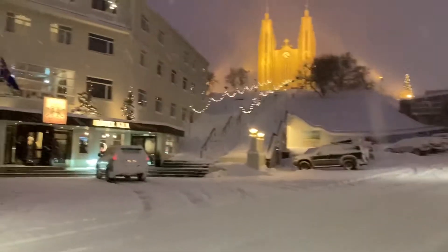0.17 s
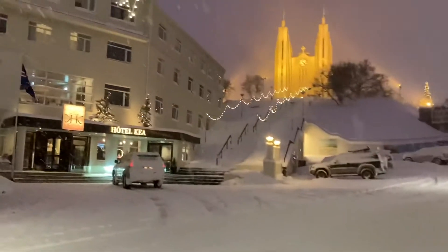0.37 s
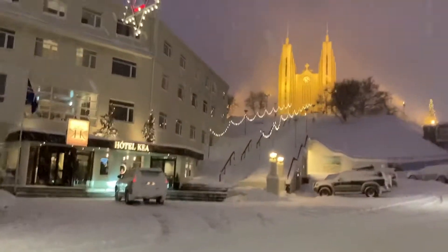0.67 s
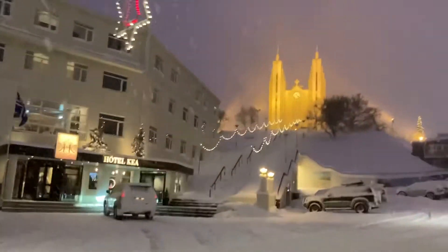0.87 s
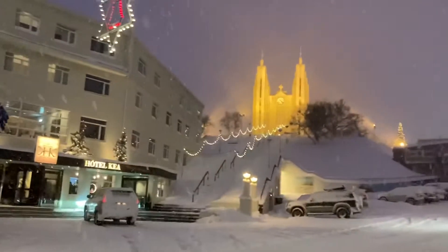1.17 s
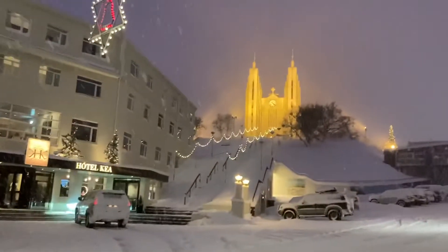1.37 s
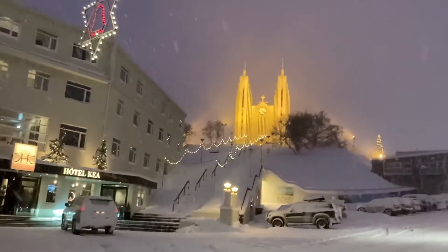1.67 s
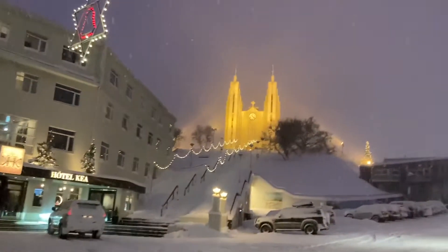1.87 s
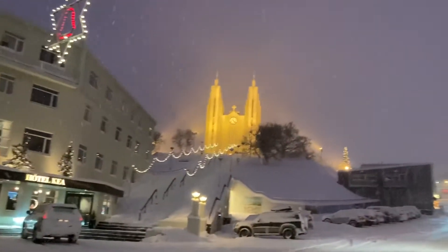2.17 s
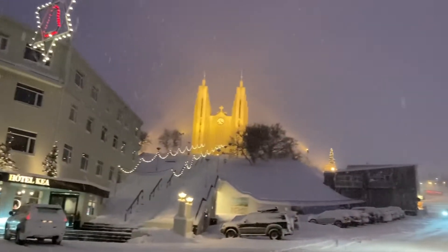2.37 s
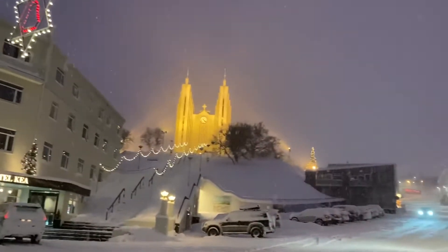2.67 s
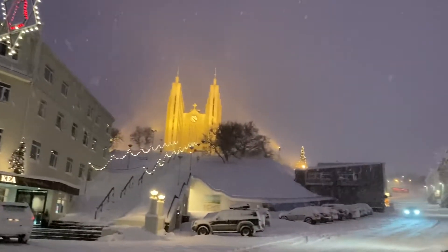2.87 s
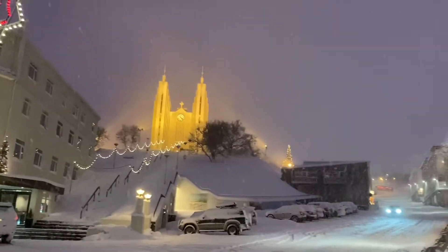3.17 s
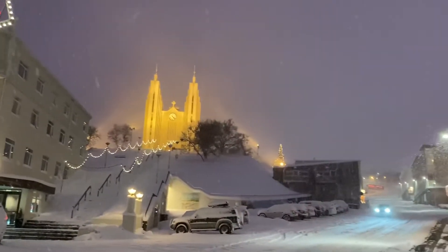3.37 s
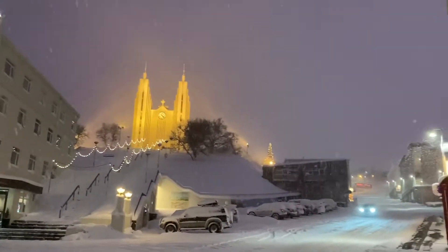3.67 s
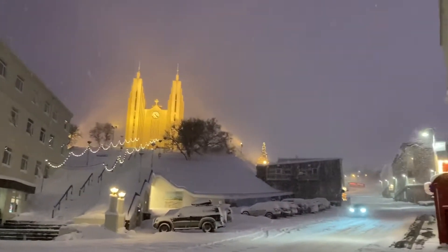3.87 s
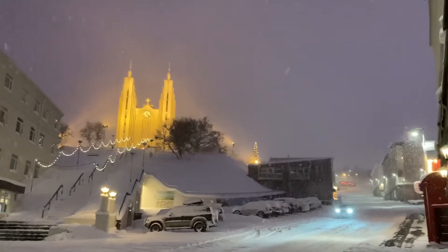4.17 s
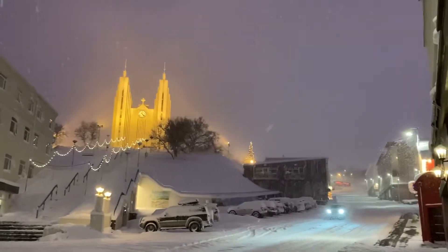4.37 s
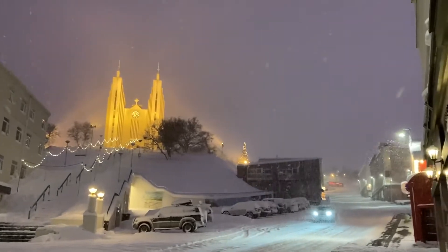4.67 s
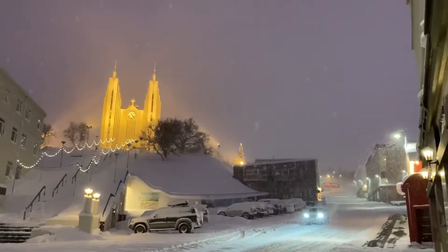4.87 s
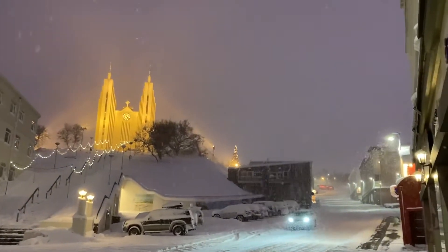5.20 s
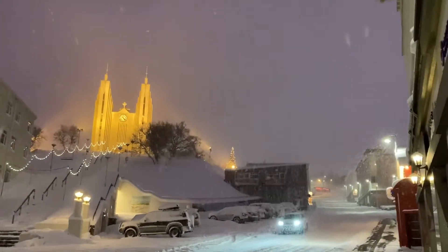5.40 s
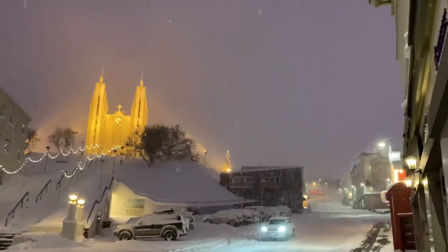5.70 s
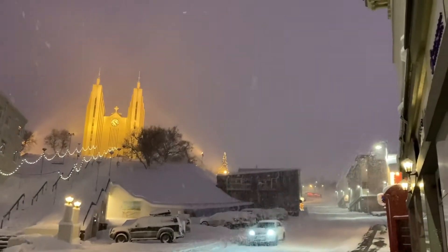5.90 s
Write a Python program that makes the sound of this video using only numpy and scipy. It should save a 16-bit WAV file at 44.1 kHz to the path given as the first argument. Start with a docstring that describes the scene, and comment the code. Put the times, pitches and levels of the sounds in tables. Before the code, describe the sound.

A low exhaust boom climbs in pitch and dies away to the left with hissing tyres, over wind rumble, muffled distant traffic and a faint fan hum. Small squeaks and jacket swishes sit near the phone's two microphones. Then another car approaches from ahead, engine and tread roar swelling with gritty snow crunch; late on its tyres thump through ruts and crush a few snow clods. No voices.

```python
"""A snow-covered town street at night, through a phone's two microphone ports. From the start a small car
gathers speed, its exhaust a rising tone and its tyres hissing noise grains, then fades. Filtered noise gives
the town and low wind, sines a fan, resonant noise its duct; a jacket soon rustles close by. Faint squeaks
follow as ringing noise bursts. A second car nears, its tyres drumming and crunching on packed snow; late on,
its tyres throb in ruts, the car booms low, and its tyres crush clods."""
import sys
import numpy as np
from scipy import signal
from scipy.fft import rfft, irfft
from scipy.io import wavfile

SR = 44100
rng = np.random.default_rng(int(sys.argv[2]) if len(sys.argv) > 2 else 0)


def output_pcm(signal):
    """Save a mono or channel-first signal as 16-bit PCM at the path in sys.argv[1].

    Samples are clipped to [-1, 1] before scaling.
    """
    pcm = np.clip(np.atleast_2d(signal).T, -1, 1) * 32767
    wavfile.write(sys.argv[1], SR, np.round(pcm).astype(np.int16))


N = 266364
TIME_S = np.arange(N) / SR
FREQS_HZ = np.maximum(np.fft.rfftfreq(N, 1 / SR), 1)

# Exhaust boom of the leaving car. Each row: time in seconds, level in dB.
BOOM_DB = [(0, -32.5), (.2, -44.5), (.5, -37.5), (1.25, -38.5), (1.8, -33.5), (2.2, -31), (2.55, -35),
           (3.3, -34.5), (3.8, -41.5), (4.1, -37.5), (4.5, -54)]
# Tyre hiss of the leaving car. Each row: frequency in Hz, relative density in dB per Hz.
LEAVING_HISS_DB = [(250, -8.5), (500, -2.5), (900, 4), (1400, 0.5), (2200, -5.5), (3200, -10), (4200, -18),
                   (6000, -32.5), (12000, -46.5)]
# Town hum. Each row: frequency in Hz, relative density in dB per Hz.
TOWN_SPECTRUM_DB = [(60, 10), (110, 9.5), (180, 4), (260, -1), (350, -0.5), (460, -6.5), (600, -4.5),
                    (760, -5), (890, -2.5), (1050, -8.5), (1500, -14), (3000, -26.5), (5800, -35),
                    (7200, -43), (15000, -50.5)]
# Tones of a ventilation fan on a house front. Each row: frequency in Hz, level in dB.
FAN_TONES = [(70, -60), (120.6, -56), (241.2, -66.5), (361.8, -68.5)]
# Resonances of the fan's duct. Each row: frequency in Hz, width in Hz, level in dB.
DUCT_RESONANCES = [(716, 36, -64), (837, 34, -66), (892, 40, -62.5), (943, 35, -65.5)]
# Gusts over a steady breeze. Each row: centre in seconds, length in seconds, peak level in dB.
GUSTS = [(0, 0.83, -43.5), (2.1, 1.5, -44), (3.25, 0.47, -43)]
# Wind on the ports. Each row: frequency in Hz, relative density in dB per Hz.
WIND_SPECTRUM_DB = [(18, -27), (30, -21), (40, -4.5), (48, -3), (60, 0), (85, -11), (160, -17), (400, -50)]
# Swishes of the jacket sleeve. Each row: centre in seconds, length in seconds, peak level in dB.
SWISHES = [(.1, 0.76, -71.5), (.49, 0.3, -72.5), (.72, 0.33, -75.5), (1.78, .14, -79), (3.82, 0.15, -74),
           (4.04, 0.12, -70.5), (4.47, 0.74, -71), (4.585, 0.17, -69), (4.69, 0.17, -72.5), (5.95, 1, -72)]
# Jacket cloth. Each row: frequency in Hz, relative density in dB per Hz.
CLOTH_DB = [(1500, -11.5), (3600, 9), (5600, 1.5), (7000, -4), (8300, 2.5), (10000, -7), (12000, -22.5),
            (15000, -21)]
# Faint squeaks and scrapes. Each row: centre in seconds, length in seconds, frequency in Hz, width in Hz,
# level in dB, glide in Hz per second, phase lead of the left port in rad.
SQUEAKS = [(1.302, .5, 3180, 600, -69.5, 0, 4.5), (2.0, .2, 2600, 700, -68, -1, 4.5),
           (2.44, .015, 4850, 395, -73, 1, 1), (2.565, 0.011, 4020, 400, -64.5, -1, .8),
           (2.62, .1, 4200, 600, -75.5, -4, .8), (2.779, .2, 2790, 1100, -69.5, 0, .8),
           (2.791, 0.49, 4410, 321, -74.5, 800, .8), (2.973, 0.13, 1130, 110, -54.5, 898, 0.33),
           (3.01, .11, 4610, 200, -76, -1500, .8), (3.7, .2, 1750, 450, -61, 0, .3),
           (4.585, 0.07, 3580, 520, -66, 0, 1), (4.655, 0.006, 4700, 900, -67, 0, 1.9),
           (5.69, .19, 3620, 130, -68.5, -600, 1.4), (5.8, .4, 4500, 2000, -77, 0, 1.4),
           (5.83, 0.26, 3644, 220, -68, 297, 1.4), (5.901, .6, 2550, 700, -72, 0, 3),
           (5.978, 0.23, 3660, 220, -75, 0, 1.7)]
# Drumming, roar and crunch of the nearing car. Each row: frequency in Hz, relative density in dB per Hz.
DRUM_SPECTRUM_DB = [(30, -33), (48, -15), (62, 3.5), (92, -1), (145, 1.5), (180, -5.5), (225, -6.5),
                    (252, -14), (400, -34.5), (900, -53)]
ROAR_SPECTRUM_DB = [(120, -9.5), (280, -6.5), (480, -1.5), (720, -0.5), (950, -9.5), (1400, -11),
                    (2200, -21), (5000, -50.5)]
CRUNCH_SPECTRUM_DB = [(300, -22.5), (600, -5.5), (900, 4), (1150, 0), (1380, -3), (1700, -0.5),
                      (1950, -6.5), (2200, -11.5), (3500, -21.5), (5000, -38.5), (9000, -40.5),
                      (15000, -58.5)]
# Engine of the nearing car. Each row: order of the crankshaft, level in dB against the tread roar.
ENGINE_ORDERS = [(3, 2.5), (7, -3), (9, -11), (10, -9), (13, -10.5), (15, -16.5), (16, -11), (18, -16.5),
                 (21, -14.5), (23, -18)]
# Tiny ticks of the jacket. Each row: centre in seconds, length in seconds, frequency in Hz, width in Hz, level in dB.
TICKS = [(3.427, .008, 7700, 900, -78), (6.008, 0.0037, 9000, 2000, -66)]
# Tyres dropping into ruts, one throb each, and one low boom of the car as it nears (the row at 5.755 s). Each
# row: centre in seconds, length in seconds, frequency in Hz, width in Hz, level in dB.
LOW_THROBS = [(4.765, 0.046, 145, 29, -36), (4.875, 0.075, 134, 64, -33.5), (5.02, .13, 80.4, 15, -34.5),
              (5.35, 0.14, 112, 10.3, -32), (5.46, .11, 90.3, 10, -31), (5.63, 0.11, 100, 21, -28),
              (5.755, 0.14, 88, 8.5, -28.5), (5.93, 0.14, 223, 12.7, -40)]
# Snow clods crushed under a tyre. Each row: centre in seconds, length in seconds, frequency in Hz, width in Hz,
# level in dB.
CLODS = [(5.305, 0.0047, 2720, 900, -67), (5.3605, 0.0057, 840, 800, -40.5),
         (5.379, 0.0094, 1500, 700, -48), (5.39, 0.0057, 1510, 604, -40), (5.388, .06, 1544, 640, -48),
         (5.4, .14, 479, 360, -49)]
# Phase lead of the left port by direction. Each row: frequency in Hz, lead in rad.
FROM_LEFT_RAD = [(100, -3), (430, 1.5), (1100, 1.47), (1550, 3), (2200, 5.5), (3000, 5.5), (4300, 9),
                 (5400, 12.5), (8300, 9.5), (11000, 8.5), (15000, 15)]
FROM_AHEAD_RAD = [(100, 0), (1100, 0.2), (1800, 0.16), (2200, 2.5), (2800, 4), (3600, 4), (4300, 7),
                  (5400, 9.5), (8300, 12), (11000, 14), (15000, 19.5)]
FROM_HOLDER_RAD = [(1500, 2.5), (4300, 1.5), (5400, 3.5), (7000, 7.5), (8300, -2), (11000, 8), (15000, 11)]
# Balance of the ports. Each row: frequency in Hz, left minus right in dB.
PORT_BALANCE_DB = [(60, 1.77), (320, 1.54), (490, 1.8), (740, 4.35), (1130, 3.6), (1710, .7), (2600, -1.6),
                   (6000, 0.08)]
# Likeness of diffuse sound at the ports. Each row: frequency in Hz, likeness from 0 to 1.
DIFFUSE_LIKENESS = [(150, 1), (330, 0.93), (520, 0.67), (900, 0.61), (1400, 0.59), (2500, 0.19),
                    (4500, 0.89), (5500, 1), (9000, 1)]

# leaving car: the firing rate climbs ever faster
FIRING_HZ, CLIMB_HZ_PER_S, CLIMB_HZ_PER_S2 = 59.9, 1.68, .59
THROTTLE_ON_S, THROTTLE_ATTACK_S, THROTTLE_OFF_S, THROTTLE_RELEASE_S = 0.476, 0.5, 3, 0.54
PIPE_HZ, PIPE_WIDTH_HZ, OCTAVE_DB = 136.1, 11, -34.5
LEAVING_DB, TURNS_AWAY_S, AWAY_FADE_S, AWAY_LOSS_DB = -54.5, 2, 1, 12
# surroundings and jacket
TOWN_DB, BREEZE_DB, RUB_DB = -47, -49, -90
CREASE_HZ = 7500  # the cloth's hiss varies separately above and below
# nearing car: straight path, steady speed, screened by houses until in view
SPEED_M_S, PASSES_S, NEAREST_M = 7.4, 6, 7.76
IN_VIEW_S, SCREEN_DB_PER_S = 2.87, 5.5
# levels at the nearest point; losses per doubling of distance
DRUM_DB, DRUM_LOSS_DB = -32.5, 6
ROAR_DB, ROAR_LOSS_DB = -47, 14.5
CRUNCH_DB, CRUNCH_LOSS_DB = -50.5, 1.25
SHAFT_HZ = 31.35
CLOD_LEAD_RAD = .3
# echo off the house front across the street
FRONT_DELAY_S, FRONT_DB, FRONT_DULL_HZ = .01805, -12, 1100
TOP_HZ, FADE_S = 15100, .006
# each port takes half of a phase or level difference, left first
PORT_HALVES = np.array([[.5], [-.5]])


def undb(db):
    """Decibels to gain."""
    return 10 ** (np.asarray(db) / 20)


def ramp(start_s, length_s):
    """Rises from 0 to 1, then holds."""
    return np.clip((TIME_S - start_s) / length_s, 0, 1)


def swells(table, steady_db):
    """Gain of a steady level plus events that swell and die away; powers add."""
    power = undb(steady_db) ** 2
    for centre_s, length_s, db in table:
        arch = np.sin(np.pi * ramp(centre_s - length_s / 2, length_s))
        power = power + (undb(db) * arch) ** 2
    return np.sqrt(power)


def across(points):
    """(Hz, value) points joined on a log-frequency axis, held beyond the ends."""
    hz, value = np.transpose(points)
    return np.interp(np.log(FREQS_HZ), np.log(hz), value)


def colour(points):
    """Gain of a (Hz, dB) spectrum, rolling off beyond its ends."""
    low_cut = np.minimum(FREQS_HZ / points[0][0], 1) ** 3
    high_cut = np.minimum(points[-1][0] / FREQS_HZ, 1) ** 2
    return undb(across(points)) * low_cut * high_cut


def unit(x):
    """Scale to rms 1."""
    return x / np.sqrt(np.mean(x ** 2))


def walk(rate_hz, step_samples=32):
    """Smooth random wandering with components up to about rate_hz, rms 1."""
    times_s = TIME_S[::step_samples]
    count = len(times_s)
    smooth = 1 / (1 + (np.fft.rfftfreq(count, step_samples / SR) / rate_hz) ** 4)
    coarse = irfft(rfft(rng.standard_normal(count)) * smooth, count)
    return unit(np.interp(TIME_S, times_s, coarse))


def turning_phase(hz):
    """Phase in rad of a tone whose frequency may vary."""
    return 2 * np.pi * np.cumsum(hz) / SR


def hiss():
    """Three unrelated noises: one shared, one for each port."""
    return rng.standard_normal((3, N))


def grains(per_second, spread_db):
    """Three unrelated streams of tiny fractures, some bigger than the rest."""
    sizes = undb(spread_db * np.minimum(rng.exponential(size=(3, N)), 3))
    struck = rng.random((3, N)) < per_second / SR
    return np.sign(hiss()) * sizes * struck


def ports(drive, gain, lead_rad, likeness):
    """Colour a sound for both ports: a shared part that leads on the left, plus unrelated parts; rms 1."""
    spectra = rfft(drive) * gain
    likeness = np.clip(likeness, 0, 1)
    shared = spectra[0] * np.exp(1j * lead_rad * PORT_HALVES)
    return unit(irfft(np.sqrt(likeness) * shared + np.sqrt(1 - likeness) * spectra[1:], N))


def likeness_of(direct):
    """The more direct the sound, the more alike the ports."""
    return direct + (1 - direct) * across(DIFFUSE_LIKENESS)


def front_echo():
    """Direct sound plus an echo dulled by the snow: a comb of peaks."""
    echo = np.exp(-2j * np.pi * FREQS_HZ * FRONT_DELAY_S) / (1 + (FREQS_HZ / FRONT_DULL_HZ) ** 2)
    return 1 + undb(FRONT_DB) * echo


def ring(centre_s, length_s, hz, width_hz, db, glide_hz_per_s=0, lead_rad=0):
    """A short run of jolts or slips rings one resonance, swelling and dying away."""
    jolts = rng.standard_normal(SR) + 1j * rng.standard_normal(SR)
    span = np.flatnonzero(np.abs(TIME_S - centre_s) < length_s / 2)
    t = TIME_S[span] - centre_s
    # the narrower the resonance, the more slowly its strength wanders
    lowpass = signal.butter(4, width_hz / 2, fs=SR, output="sos")
    strength = signal.sosfilt(lowpass, jolts)[-len(t):]
    phase = 2 * np.pi * (hz + glide_hz_per_s * t / 2) * t
    wave = strength * np.exp(1j * (phase + lead_rad * PORT_HALVES))
    out = np.zeros((2, N))
    out[:, span] = unit(wave.real) * np.cos(np.pi * t / length_s) * undb(db)
    return out


def leaving_exhaust(wobble=.001, throb_db=.2):
    """Firings boom as a sine; the throttle adds their octave, climbing through a pipe resonance."""
    firing_hz = FIRING_HZ + CLIMB_HZ_PER_S * TIME_S + CLIMB_HZ_PER_S2 * TIME_S ** 2
    phase = turning_phase(firing_hz * (1 + wobble * walk(5.4)))
    throttle = ramp(THROTTLE_ON_S, THROTTLE_ATTACK_S) - ramp(THROTTLE_OFF_S, THROTTLE_RELEASE_S)
    pipe = 1 / np.hypot(1, 2 * (2 * firing_hz - PIPE_HZ) / PIPE_WIDTH_HZ)
    boom = np.cos(phase) * undb(np.interp(TIME_S, *np.transpose(BOOM_DB)))
    octave = np.cos(2 * phase) * throttle * pipe * undb(OCTAVE_DB)
    return np.sqrt(2) * (boom + octave) * undb(throb_db * walk(16))


def leaving_tyres(patchy_db=1.22):
    """Grains hiss under the tyres from the left, dying down as the car turns away."""
    away = 1 - np.exp(-np.maximum(TIME_S - TURNS_AWAY_S, 0) / AWAY_FADE_S)
    gain = colour(LEAVING_HISS_DB) * front_echo()
    fractures = grains(per_second=9800, spread_db=1.0)
    tyres = ports(fractures, gain, across(FROM_LEFT_RAD), likeness_of(direct=0.68))
    return tyres * undb(LEAVING_DB - AWAY_LOSS_DB * away + patchy_db * walk(13))


def town(swell_db=.5):
    """Far traffic as noise diffused by the house fronts, swelling a little."""
    gain = colour(TOWN_SPECTRUM_DB) * front_echo()
    hum = ports(hiss(), gain, across(FROM_AHEAD_RAD), across(DIFFUSE_LIKENESS))
    return hum * undb(TOWN_DB + swell_db * walk(2.6))


def fan(waver_db=-1.0):
    """Fan tones of steady pitch, wavering in level on the way across the street."""
    out = 0
    for hz, db in FAN_TONES:
        tone = np.sqrt(2) * np.cos(2 * np.pi * (hz * TIME_S + rng.random()))
        out = out + tone * undb(db + waver_db * walk(2.4))
    return out


def duct(drift=.012, swell_db=1.5):
    """Rushing air rings the fan's duct; each resonance drifts and swells on its own."""
    out = 0
    for hz, width_hz, db in DUCT_RESONANCES:
        phase = turning_phase(hz * (1 + drift * walk(1.477)))
        rush = walk(width_hz / 2) * np.cos(phase) + walk(width_hz / 2) * np.sin(phase)
        out = out + rush * undb(db + swell_db * walk(4.1))
    return out


def wind(buffet_db=2.5):
    """Low noise buffets the ports, following the gusts."""
    rumble = ports(hiss(), colour(WIND_SPECTRUM_DB), 0, likeness_of(direct=0.4))
    return rumble * swells(GUSTS, BREEZE_DB) * undb(buffet_db * walk(9.0))


def jacket(catch_db=1.0, pressure_db=0.6, crease_db=2.5):
    """Fibres catch and slip as the arm turns, over a smooth rub; shifting creases change the colour."""
    fibres = unit(grains(per_second=3000, spread_db=4)) + hiss()
    cloth = rfft(ports(fibres, colour(CLOTH_DB), across(FROM_HOLDER_RAD), likeness_of(direct=0.94)))
    upper = 1 / (1 + (CREASE_HZ / FREQS_HZ) ** 8)
    creased = sum(irfft(cloth * part, N) * undb(crease_db * walk(16)) for part in (upper, 1 - upper))
    return creased * swells(SWISHES, RUB_DB) * undb(catch_db * walk(25) + pressure_db * walk(8))


def squeaks():
    """Squeaks and scrapes: slips ring resonances, some gliding in pitch."""
    return sum(ring(*row) for row in SQUEAKS)


def nearing_engine(waver_db=2.0, wobble=0.0026):
    """Crankshaft orders, each wavering as the path through the street changes."""
    phase = turning_phase(SHAFT_HZ * (1 + wobble * walk(3.64)))
    out = 0
    for order, db in ENGINE_ORDERS:
        tone = np.sqrt(2) * np.cos(round(order) * phase + 2 * np.pi * rng.random())
        out = out + tone * undb(db + waver_db * walk(2.4))
    return out


def nearing_car(bumps_db=0.5, throb_db=0.9, patchy_db=1.1):
    """Bumps drum on tyres, tread and engine roar, snow grains break; all grow as distance shrinks."""
    distance_m = np.hypot(NEAREST_M, SPEED_M_S * (TIME_S - PASSES_S))
    doublings = np.log2(distance_m / NEAREST_M)
    screened_db = SCREEN_DB_PER_S * np.maximum(IN_VIEW_S - TIME_S, 0)
    shared_bumps_db = bumps_db * walk(4.2)
    lead_rad, echo = across(FROM_AHEAD_RAD), front_echo()

    drum = ports(hiss(), colour(DRUM_SPECTRUM_DB), lead_rad, likeness_of(direct=0.92))
    drum_level_db = DRUM_DB - DRUM_LOSS_DB * doublings + shared_bumps_db + throb_db * walk(7)

    tread = ports(hiss(), colour(ROAR_SPECTRUM_DB) * echo, lead_rad, likeness_of(direct=0.74))
    roar = tread + nearing_engine()
    roar_level_db = ROAR_DB - ROAR_LOSS_DB * doublings + shared_bumps_db

    fractures = grains(per_second=4000, spread_db=2.5)
    crunch = ports(fractures, colour(CRUNCH_SPECTRUM_DB) * echo, lead_rad, likeness_of(direct=0.62))
    crunch_level_db = CRUNCH_DB - CRUNCH_LOSS_DB * doublings + patchy_db * walk(9.6)

    car = drum * undb(drum_level_db) + roar * undb(roar_level_db) + crunch * undb(crunch_level_db)
    return car * undb(-screened_db)


def ticks():
    """Tiny jacket ticks: very short bursts ring high resonances."""
    return sum(ring(*row) for row in TICKS)


def low_throbs():
    """Tyres drop into ruts and boom, and the car itself booms low as it nears; each throb rings one low
    resonance."""
    return sum(ring(*row) for row in LOW_THROBS)


def clods():
    """Clods crushed under a tyre ring broad resonances, the left port leading."""
    return sum(ring(*row, lead_rad=CLOD_LEAD_RAD) for row in CLODS)


def scene():
    """Both cars, the surroundings and the small sounds, summed."""
    leaving = leaving_exhaust() + leaving_tyres()
    surroundings = town() + fan() + duct() + wind()
    small = jacket() + squeaks() + ticks()
    nearing = nearing_car() + low_throbs() + clods()
    return leaving + surroundings + small + nearing


def record(dry):
    """The two ports differ in colour; the phone cuts the top."""
    fade = np.clip(np.minimum(TIME_S, TIME_S[-1] - TIME_S) / FADE_S, 0, 1)
    balance = undb(across(PORT_BALANCE_DB) * PORT_HALVES)
    heard = irfft(rfft(dry * fade) * balance, N)
    return signal.sosfilt(signal.ellip(8, .2, 70, TOP_HZ, fs=SR, output="sos"), heard)


dry = scene()
out = record(dry)
output_pcm(out)
```